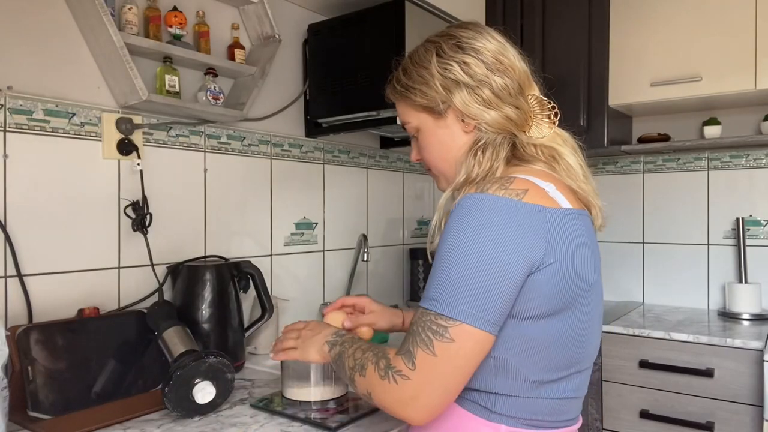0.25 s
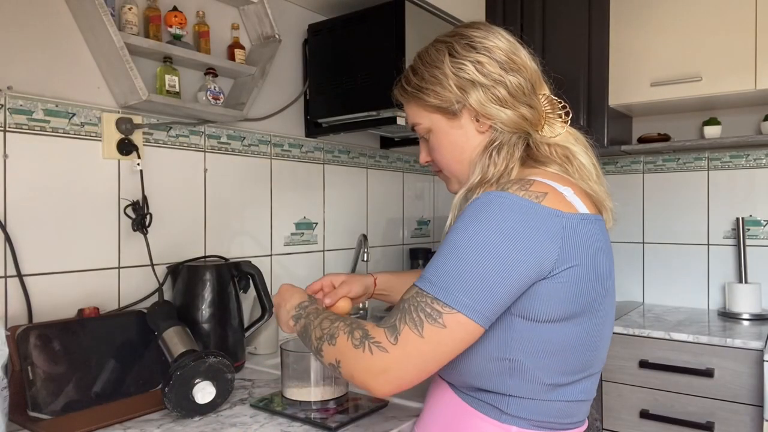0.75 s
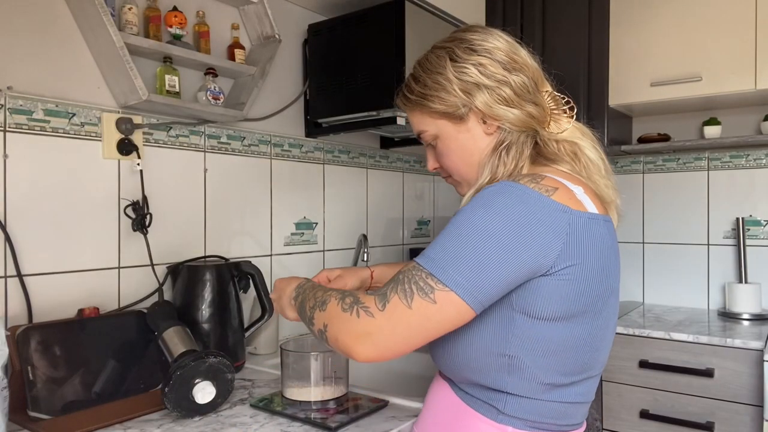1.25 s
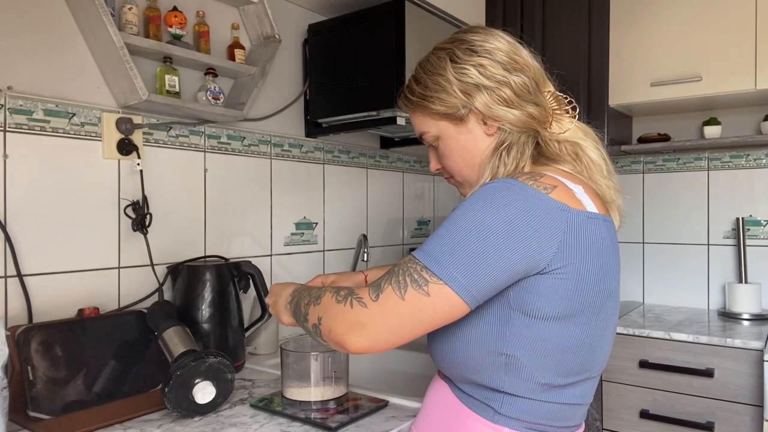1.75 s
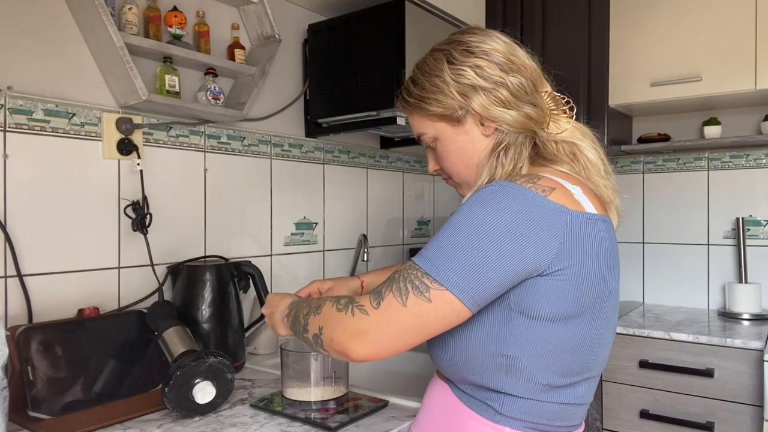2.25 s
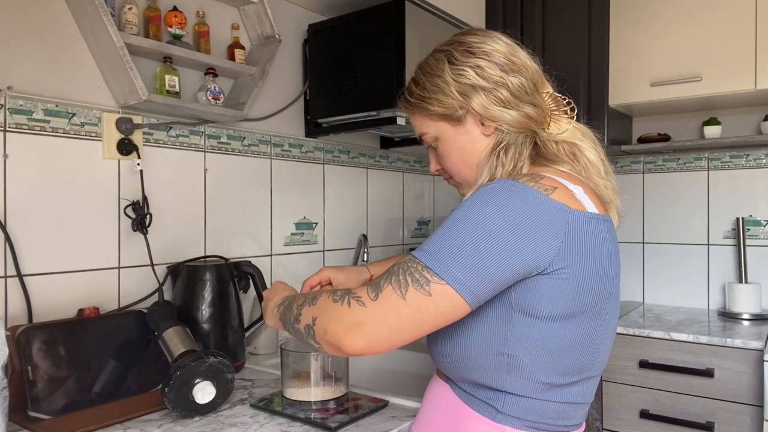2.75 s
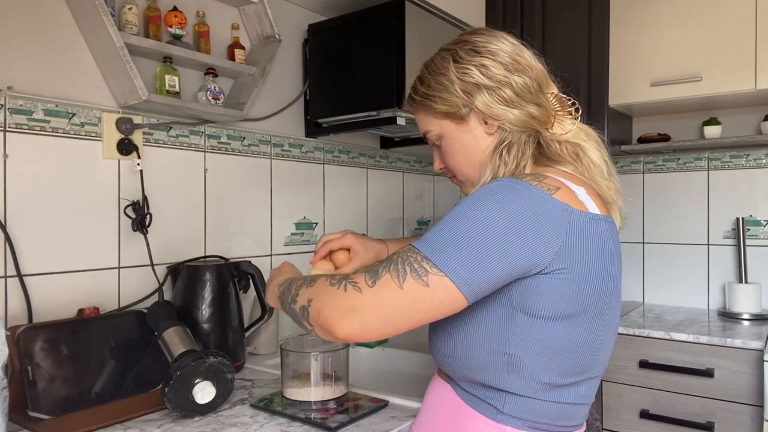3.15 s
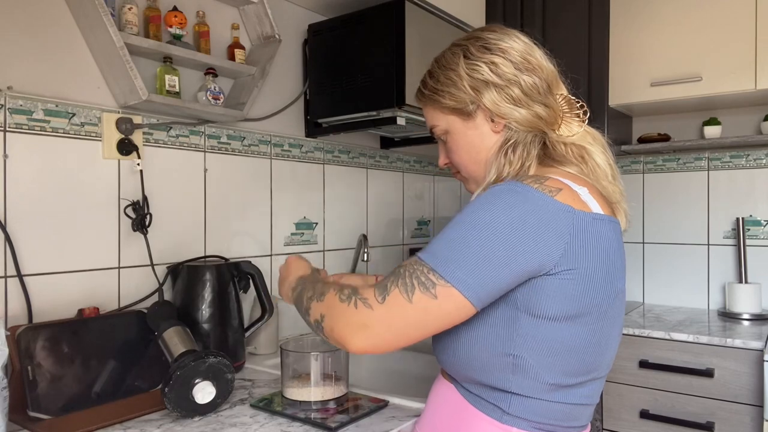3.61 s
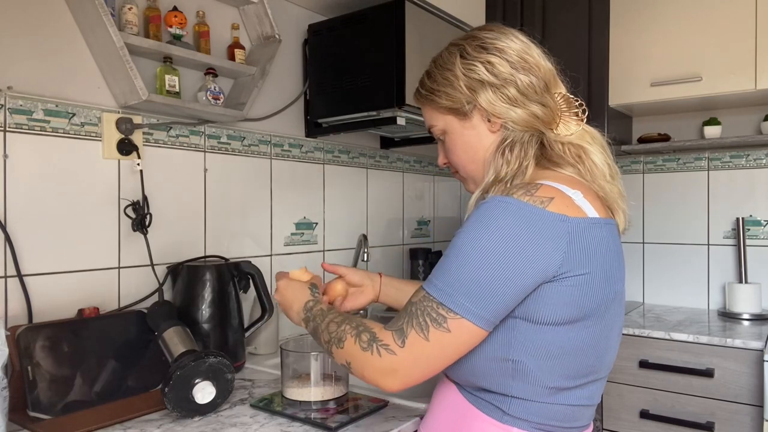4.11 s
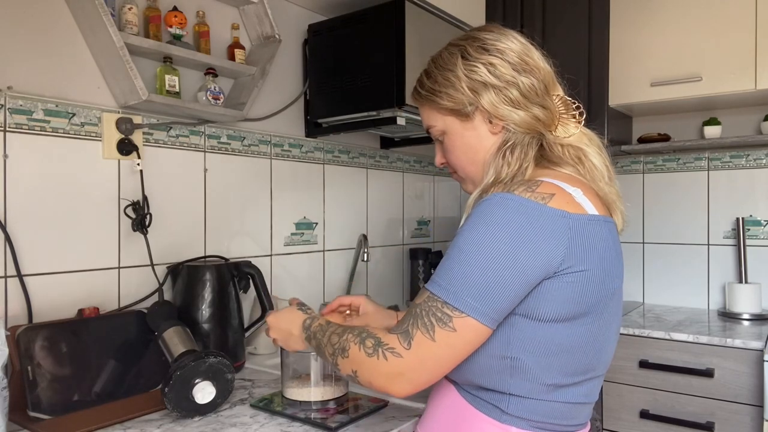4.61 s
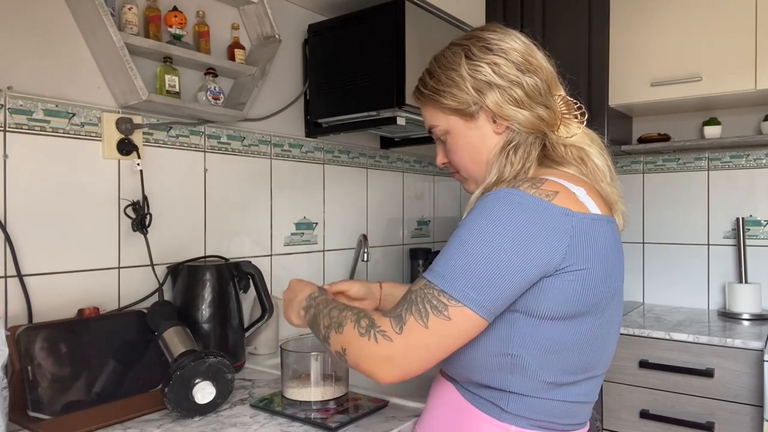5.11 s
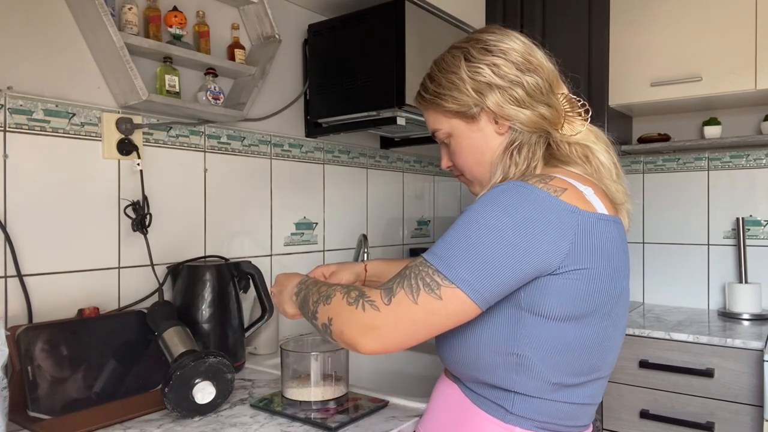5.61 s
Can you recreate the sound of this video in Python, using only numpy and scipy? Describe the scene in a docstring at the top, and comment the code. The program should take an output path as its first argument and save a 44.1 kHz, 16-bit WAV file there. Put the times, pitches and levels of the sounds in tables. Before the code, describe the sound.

A close stereo recording in a small tiled kitchen, with short bright reflections, over a soft low hum and dull rumble leaning left. At 0.0 and 0.15 s an egg knocks the rim of a plastic beaker: a faint first touch with a tiny rising squeak, then a crunchier crack, with a low bouncing thud from the board. Faint ticks follow at 0.7 and 1.1 s. Around 1.55-1.6 s the shell snaps rapidly and a thumb breaks in with a dull pop; near 2.25-2.3 s a stronger hollow crunch and second pop tear the halves apart. From 2.6 to 4.5 s there are only sparse hollow ticks, faint crackle and thin fingertip rubs, while low tones gently swell and fade. At 4.58 and 4.79 s two solid knocks crunch and ring the plastic, thumping the worktop. From 5.2 s to the end the second egg is prised open in small dry snaps and crackle.

```python
"""At the worktop of a small tiled kitchen, two microphones close by, a hum and a dull rumble run throughout.
First an egg knocks and squeaks on the rim of a plastic blender beaker: shell crushes, plastic rings, board bounces.
Thumbs then snap the shell, break in with a dull pop, tear the halves apart and rub the shell, which rings hollow.
A few low tones swell and fade in the rumble, the first before the shell opens, two more as the hands work on.
Late on come two more knocks, one last low swell, and a second egg is prised open in snaps and crackle."""
import sys
import numpy as np
from scipy import signal
from scipy.fft import rfft, irfft
from scipy.io import wavfile
from scipy.ndimage import uniform_filter1d

SR = 44100
rng = np.random.default_rng(int(sys.argv[2]) if len(sys.argv) > 2 else 0)


def to_wav(s):
    """Save 16-bit WAV."""
    ch = np.atleast_2d(s).T  # columns
    pcm = np.round(np.clip(ch, -1, 1) * 32767)  # PCM
    wavfile.write(sys.argv[1], SR, pcm.astype(np.int16))


N = 258749
TIME = np.arange(N) / SR

# Levels in the tables are at the source: gains in the functions, the room and the microphones come on top.
# egg on the rim: start_s, crunch_db, beaker_db, thud_db, crush_s, beaker_tilt_db_per_octave,
#                 egg_body_hz, egg_body_db, shell_wall_hz, shell_wall_db
KNOCKS = [(0.0, -35, -37, -37, 0.0029, -0.5, 1030, -39.5, 2570, -36),
          (0.153, -20.5, -42, -34, 0.004, -3, 840, -34.5, 3710, -43),
          (4.581, -21.5, -27.5, -32, 0.0037, -0.7, 1120, -31, 2190, -38.5),
          (4.786, -21.5, -32.5, -32, 0.005, 0, 970, -33.5, 2950, -38)]
# shell crushed on the rim, spectrum: pitch_hz, level_db
CRUNCH_SPECTRUM = [(100, -27), (300, -3.5), (550, -1.5), (800, 6), (1100, 4.5), (1500, 6), (2200, -3.5),
                   (3000, 3), (4100, -7.5), (5300, -1), (7000, -4), (9700, -5), (13000, 5), (14600, -38)]
# short clack of the beaker wall, spectrum: pitch_hz, level_db
CLACK_SPECTRUM = [(100, -26.5), (300, -1.5), (500, -11.5), (700, -1.5), (870, -3), (1100, -1), (1500, 0),
                  (2100, -4.5), (3200, -9), (6000, -14), (15000, -27)]
# ringing modes of the beaker: pitch_hz, level_db, t60_s
BEAKER_MODES = [(328, -9.5, 0.15), (632, -7.5, .06), (705, 3.5, 0.09), (1050, -2, 0.14), (1364, 1, .11),
                (1450, 8, 0.13), (1564, -4, 0.12), (1797, -3, 0.09), (1950, -2.5, .15), (2614, -12, 0.06),
                (3120, -15.5, 0.07)]
# ringing modes of the worktop: pitch_hz, level_db, t60_s
WORKTOP_MODES = [(49.6, 5, 0.99), (83.5, -3.5, 0.17), (99.4, 1, 0.29), (223, -20, 0.44)]

# egg skidding on the rim: start_s, length_s, start_pitch_hz, level_db
SKIDS = [(0.0, 0.0377, 698, -42), (0.047, 0.028, 692.5, -48.5)]
SKID_RISE_HZ_PER_S, SKID_FADE_DB_PER_S = 1525, 91.5

# dull rumble, spectrum: pitch_hz, level_db
RUMBLE_SPECTRUM = [(15, -28.5), (28, -3.5), (59, -4), (110, -8), (172, -10), (290, -7), (380, -8),
                   (520, -28.5), (1390, -41), (2500, -50), (3540, -59.5), (7000, -53.5), (13000, -81),
                   (14500, -85.5)]
# level of the low rumble, including the low boom left by the knocks: time_s, level_db
RUMBLE_LEVEL = [(0.0, -62), (2.12, -67), (3.12, -64), (4.17, -72.5), (4.62, -67.5), (4.75, -62),
                (5.03, -66.5), (5.52, -69), (5.87, -64.5)]
# appliance hum: pitch_hz, level_db
HUM_TONES = [(49.8, -56), (99.3, -67), (2468, -88)]
# faint diffuse air of the room, spectrum: pitch_hz, level_db
AIR_SPECTRUM = [(200, 0.5), (1300, 6), (2400, -2.5), (4000, -17), (13000, -22.5), (14500, -49)]
# low tones in the rumble, at rest: pitch_hz, level_db
LOW_TONES = [(136.8, -72), (223.4, -70.5), (252.9, -66.5)]
# one of the low tones swells and fades: start_s, length_s, pitch_hz, rise_db
SWELLS = [(0.748, 1.23, 136.8, 12.5), (2.52, 0.9, 252.9, 6), (2.798, .85, 223.4, 10.5),
          (4.434, 1.03, 223.4, 10.5)]
SWELL_EDGE_S = 0.2      # time to rise, and to fall
TONES_FOLLOW = 0.456    # share of the rumble's swing in dB that the tones follow

# shell snapping under the thumbs: start_s, snap_db, hollow_db
SNAPS = [(0.707, -52, -86.5), (1.074, -54, -60.5), (1.5479, -35.5, -52), (1.567, -40, -42),
         (1.5746, -33.5, -33), (1.606, -32, -39.5), (2.1304, -45, -44.5), (2.181, -50.5, -73),
         (2.2674, -32.5, -26.5), (2.2811, -30, -23), (2.2979, -24, -35), (2.584, -47.5, -44),
         (3.6601, -52, -45.5), (3.769, -66, -48), (3.825, -50.5, -53), (3.953, -46.5, -50.5),
         (5.138, -58.5, -50), (5.2835, -34.5, -35), (5.4054, -41, -34.5), (5.63, -72, -47.5),
         (5.6937, -43.5, -82), (5.737, -39, -70), (5.762, -45, -62)]
# snapping and tearing shell, spectrum: pitch_hz, level_db
SNAP_SPECTRUM = [(150, -3.5), (500, 2.5), (700, -4.5), (950, -17.5), (2000, 0), (3500, 0), (7000, -5),
                 (11500, 0), (13400, 0), (14600, -25)]
SNAP_LENGTH_S = .0027   # sets how long the breaks of one snap last
# hollow shell in the hands, its pitch shifting as the eggs are opened: time_s, pitch_hz, t60_s
HOLLOW = [(1.565, 1580, 0.003), (1.58, 1350, .005), (1.61, 1840, .007), (2.14, 1420, 0.0095),
          (2.26, 2150, 0.017), (2.32, 2890, 0.0059), (2.6, 1920, 0.011), (3.66, 1746, .013),
          (3.8, 1710, 0.014), (4.05, 1730, 0.018), (4.45, 1440, 0.014), (5.29, 1456, 0.012),
          (5.41, 1404, 0.0079), (5.48, 1170, .013), (5.63, 1330, 0.0097)]
# halves rubbed and prised apart, membrane tearing: start_s, length_s, crackle_db, hollow_db
TEARS = [(1.55, 0.019, -57, -51.5), (2.257, 0.068, -45, -40.5), (3.739, 0.12, -83, -57.5),
         (3.869, 0.19, -73.5, -71), (4.38, 0.27, -72.5, -68), (5.187, 0.24, -92, -60),
         (5.389, 0.078, -61, -47.5), (5.747, 0.06, -63, -80)]
GIVE_SHARE, PULL_SWELL_DB = 0.69, 10   # a pull builds over this share of its length, by this much, then gives
# thumb breaking through into the full egg: start_s, level_db
PUNCTURES = [(1.5743, -22.5), (2.283, -28)]
POP_HZ, POP_T60_S = 513, 0.011
# fingertip sliding on smooth shell: start_s, length_s, pitch_hz, level_db
RUBS = [(1.864, 0.032, 4650, -76.5), (2.057, 0.018, 3700, -74), (3.82, 0.11, 6430, -78),
        (3.928, 0.036, 4960, -67.5), (4.235, 0.081, 4980, -79)]

# decay of the kitchen: pitch_hz, t60_s
KITCHEN_DECAY = [(150, 0.9), (530, 0.26), (1400, 0.34), (3700, 0.37), (7000, 0.32), (12000, 0.26)]
# colour of the microphone pair, left minus right: pitch_hz, difference_db
EAR_COLOUR = [(250, 9.5), (500, 0), (750, 0), (1400, 1.5), (2800, 0), (4000, -3), (6500, -10.5), (8000, 1),
              (10000, 2)]
HANDS_PAN_DB = -1.5     # left minus right: the hands sit slightly right
TOP_STOP_HZ = 16500     # nearly nothing passes above this


def from_db(db):
    """Decibels to gain."""
    return 10 ** (np.asarray(db) / 20)


def unit_energy(x):
    """Scale so that the squares sum to one."""
    return x / np.sqrt(np.sum(x ** 2, axis=-1, keepdims=True) + 1e-20)


def rms_one(x):
    """Scale to unit power."""
    return unit_energy(x) * np.sqrt(x.shape[-1])


def in_time(rows):
    """Columns of a curve table at every sample."""
    times, *columns = np.transpose(rows)
    return [np.interp(TIME, times, column) for column in columns]


def at_hz(points, hz):
    """Read a table on a log-frequency axis."""
    f, value = np.transpose(points)
    return np.interp(np.log(np.maximum(hz, 1)), np.log(f), value)


def add(track, s, sound):
    """Mix a sound in at time s."""
    start = max(0, round(s * SR))
    track[..., start:start + sound.shape[-1]] += sound[..., :N - start]


def panned(x, db):
    """Place a sound by its level difference, left minus right."""
    return x * from_db([[db / 2], [-db / 2]])


def drift(rate):
    """Random wander of unit power, with rate new values a second joined by straight lines."""
    knots = rng.standard_normal(int(N / SR * rate) + 2)
    return rms_one(np.interp(TIME * rate, np.arange(len(knots)), knots))


def coloured(x, spectrum, size=4096):
    """Causal (minimum-phase) filter with the given spectrum, built by folding its cepstrum."""
    cepstrum = irfft(np.log(from_db(at_hz(spectrum, np.fft.rfftfreq(size, 1 / SR)))))
    cepstrum[1:size // 2] *= 2
    cepstrum[size // 2 + 1:] = 0
    response = irfft(np.exp(rfft(cepstrum)))
    return signal.fftconvolve(np.atleast_2d(x), response[None], axes=1)[:, :x.shape[-1]]


def ring(x, hz, t60):
    """One damped mode: a two-pole resonator that falls 60 dB in t60 seconds."""
    r, w = from_db(-60 / (t60 * SR)), 2 * np.pi * hz / SR
    return signal.lfilter([np.sin(w), 0, -np.sin(w)], [1, -2 * r * np.cos(w), r * r], x + 1e-18)


def fractures(envelope, per_s, spread_db):
    """Tiny breaks of very uneven size at random moments under an envelope; unit energy."""
    n = len(envelope)
    sizes = from_db(spread_db * np.minimum(rng.exponential(1, n), 4))
    signs = rng.choice([-1, 1], n)
    happens = rng.random(n) < per_s / SR
    return unit_energy(envelope * sizes * signs * happens)


def burst(t, length):
    """A break builds quickly and dies away."""
    u = t / max(length, 1e-4)
    return np.sqrt(u) * np.exp(-2 * u)


def crack(length, per_s=12000, spread_db=3.0, size=4096, count=12):
    """A short run of fractures, flattened until it carries nearly equal energy at every pitch."""
    t = np.arange(size) / SR
    x = fractures(burst(t, length), per_s, spread_db)
    window = np.exp(-(t / max(2 * length, 1e-3)) ** 4)
    for _ in range(count):
        spectrum = rfft(x)
        x = irfft(spectrum / (np.abs(spectrum) + 1e-12)) * window
    return unit_energy(x)


def bounce(t, high_hz=77.4, low_hz=50.0, settle_s=0.047, swell_s=0.031, push_s=0.0042, modes_db=-3.0):
    """The board under the beaker rocks, its pitch sinking as the load comes off, and the worktop rings on."""
    hz = low_hz + (high_hz - low_hz) * np.exp(-t / settle_s)
    phase = 2 * np.pi * np.cumsum(hz) / SR
    rocking = unit_energy(t * np.exp(-2 * t / swell_s) * np.sin(phase))
    push = burst(t, push_s)
    modes = sum(from_db(db) * unit_energy(ring(push, f, t60)) for f, db, t60 in WORKTOP_MODES)
    return unit_energy(rocking + from_db(modes_db) * unit_energy(modes))


def knocks(crunch_db=16.5, beaker_db=22.5, clack_db=22.5, thud_db=32.0, thud_delay_s=.012,
           egg_db=17.5, body_t60=.022, wall_t60=.012):
    """Shell caves in on the rim, egg and beaker sound from that contact, and the worktop follows with a bounce."""
    shell, egg, beaker, worktop = np.zeros((4, N))
    t = np.arange(SR // 2) / SR
    for (s, shell_level, ring_level, thud_level, crush, tilt,
         body_hz, body_level, wall_hz, wall_level) in KNOCKS:
        contact = np.pad(crack(crush), (0, len(t)))
        add(shell, s, from_db(shell_level + crunch_db) * contact)
        for hz, level, t60 in ((body_hz, body_level, body_t60), (wall_hz, wall_level, wall_t60)):
            add(egg, s, from_db(level + egg_db) * unit_energy(ring(contact, hz, t60)))
        clack = unit_energy(coloured(contact, CLACK_SPECTRUM)[0])
        # each mode is struck a little differently every time
        modes = sum(from_db(db + rng.normal()) * unit_energy(ring(contact, hz, t60))
                    for hz, db, t60 in BEAKER_MODES)
        plastic = from_db(clack_db) * clack + from_db(beaker_db) * unit_energy(modes)
        hardness = [(300, -2 * tilt), (4800, 2 * tilt)]   # four octaves
        add(beaker, s, from_db(ring_level) * coloured(plastic, hardness)[0])
        add(worktop, s + thud_delay_s, from_db(thud_level + thud_db) * bounce(t))
    return coloured(shell, CRUNCH_SPECTRUM) + egg + beaker, worktop


def squeak(waver=0.066, rough_db=4.0, octave_db=-13.0):
    """Shell sticks and slips on plastic: an unsteady, rising tone and its octave, rough and fading."""
    out = np.zeros(N)
    for s, length, start_hz, level in SKIDS:
        t = np.arange(int(length * SR)) / SR
        hz = (start_hz + SKID_RISE_HZ_PER_S * t) * (1 + waver * drift(300)[:len(t)])
        phase = 2 * np.pi * np.cumsum(hz) / SR
        grip_db = rough_db * drift(250)[:len(t)] - SKID_FADE_DB_PER_S * t
        grip = signal.windows.tukey(len(t), .2) * from_db(grip_db)
        tone = np.sin(phase) + from_db(octave_db) * np.sin(2 * phase)
        add(out, s, from_db(level) * rms_one(grip * tone))
    return out


def wandering_tone(hz, wander_hz, rate):
    """A sine of unit power whose pitch wanders."""
    return rms_one(np.sin(2 * np.pi * np.cumsum(hz + wander_hz * drift(rate)) / SR))


def low_tones(swing_db, waver_db=2.0, wander_hz=1.245):
    """Low tones ride on the rumble; now and then one swells, holds and fades."""
    pitches, rest_db = np.transpose(LOW_TONES)
    levels = rest_db[:, None] + TONES_FOLLOW * swing_db
    for s, length, hz, rise_db in SWELLS:
        shape = np.clip(np.minimum(TIME - s, s + length - TIME) / SWELL_EDGE_S, 0, 1)
        levels[np.argmin(np.abs(pitches - hz))] += rise_db * shape
    return sum(from_db(db + waver_db * drift(10)) * wandering_tone(hz, wander_hz, 12)
               for hz, db in zip(pitches, levels))


def background(rumble_db=6.0, side_db=-4.5, air_db=-70.0, pan_db=4.0):
    """Hum, low tones and filtered-noise rumble lean left; faint air, independent in each microphone, fills in."""
    level, = in_time(RUMBLE_LEVEL)
    mid, side = rms_one(coloured(rng.standard_normal((2, N)), RUMBLE_SPECTRUM))
    rumble = from_db(level + rumble_db) * (mid + from_db(side_db) * side * [[1], [-1]])
    hum = sum(from_db(db) * wandering_tone(hz, 0.25, 2) for hz, db in HUM_TONES)
    air = rms_one(coloured(rng.standard_normal((2, N)), AIR_SPECTRUM))
    tones = low_tones(level - level.mean())
    return panned(rumble + hum + tones, pan_db) + from_db(air_db) * air


def shell_cavity(x, s, short_db=-11.5):
    """Hollow of the shell as held at time s: a main resonance and a weaker, shorter one at the same pitch."""
    times, pitches, rings = np.transpose(HOLLOW)
    hz, t60 = np.interp(s, times, pitches), np.interp(s, times, rings)
    return ring(x, hz, t60) + from_db(short_db) * ring(x, hz, t60 / 2)


def snaps(snap_db=12.5, hollow_db=13.5):
    """Each snap is a brief run of fractures that also sounds the hollow of the shell."""
    sharp, hollow = np.zeros((2, N))
    for s, level, hollow_level in SNAPS:
        breaks = crack(SNAP_LENGTH_S)
        add(sharp, s, from_db(level + snap_db) * breaks)
        add(hollow, s, from_db(hollow_level + hollow_db) * unit_energy(shell_cavity(breaks, s)))
    return coloured(sharp, SNAP_SPECTRUM) + hollow


def tears(per_s=700, spread_db=4.8, count=7):
    """Crackle builds until the halves give, then eases; the hollow changes pitch as the opening changes."""
    crackle, hollow = np.zeros((2, N))
    for s, length, level, hollow_level in TEARS:
        along = np.linspace(0, 1, int(length * SR))
        pull = np.interp(along, [0, GIVE_SHARE, 1], [-1, 0, -1])
        breaks = fractures(from_db(PULL_SWELL_DB * pull), per_s, spread_db)
        add(crackle, s, from_db(level) * rms_one(breaks))
        # overlapping stages, each through the cavity of its own moment
        stages = [np.maximum(0, 1 - np.abs(along * (count - 1) - k)) for k in range(count)]
        moments = np.linspace(s, s + length, count)
        glide = sum(shell_cavity(breaks * stage, moment) for stage, moment in zip(stages, moments))
        add(hollow, s, from_db(hollow_level) * rms_one(glide))
    return coloured(crackle, SNAP_SPECTRUM) + hollow


def punctures(cave_in_s=0.005):
    """The shell caves in and the liquid behind it gives one short, low resonance."""
    out = np.zeros(N)
    for s, level in PUNCTURES:
        pop = ring(crack(cave_in_s), POP_HZ, POP_T60_S)
        add(out, s, from_db(level) * unit_energy(pop))
    return out


def rubs(wall_t60=.008, per_s=3600, spread_db=7.0):
    """Tiny slips of skin ring the thin shell wall."""
    out = np.zeros(N)
    for s, length, hz, level in RUBS:
        slips = fractures(np.sqrt(np.hanning(int(length * SR))), per_s, spread_db)
        add(out, s, from_db(level) * rms_one(ring(slips, hz, wall_t60)))
    return out


def evenly_coloured(response, size=4096):
    """Even colouring of a reflection pattern: narrow peaks and dips of pitch are levelled to their surroundings."""
    power = np.abs(rfft(response)) ** 2
    bins_per_hz = len(response) / SR
    narrow, wide = (uniform_filter1d(power, int(width_hz * bins_per_hz)) for width_hz in (130, 2500))
    hz = np.fft.rfftfreq(len(response), 1 / SR)
    levelling = np.c_[hz, 10 * np.log10(wide / narrow)][1:]
    return coloured(response, levelling, size=size)[0]


def kitchen(x, direct_db, early_db, tail_db, early_s=0.0037, lag_s=.00056, size=32768, count=11):
    """Direct sound, a quick scatter off the tiled corner, and a tail that lasts longest in the bass."""
    t, hz = np.arange(size) / SR, np.fft.rfftfreq(size, 1 / SR)
    centres = np.geomspace(100, 15000, count)
    white, tail = rfft(rng.standard_normal((2, size))), 0
    for centre, weights in zip(centres, np.eye(count)):
        band = irfft(white * at_hz(np.c_[centres, weights], hz))
        tail = tail + band * from_db(-60 * t / at_hz(KITCHEN_DECAY, centre))
    late = from_db(tail_db) * unit_energy(tail * (1 - np.exp(-t / 0.0025)))
    early = from_db(early_db) * np.array([crack(early_s, size=size) for ear in range(2)])
    early[[0, 1], [0, round(lag_s * SR)]] += from_db(direct_db)   # the left microphone is nearer
    response = sum(np.array([evenly_coloured(ear) for ear in part]) for part in (early, late))
    return signal.fftconvolve(x, response, axes=1)[:, :N]


def ear_coloured(x):
    """Each microphone colours rim and hands its own way: left fuller in low mids, right brighter near 6 kHz."""
    return np.array([coloured(ear, [(hz, side * db / 2) for hz, db in EAR_COLOUR])[0]
                     for ear, side in zip(x, (1, -1))])


def scene():
    """Rim and hands sound through the kitchen from their own places; thud and background come in directly."""
    rim, worktop = knocks()
    at_rim = kitchen(panned(rim + squeak(), db=-1.0), direct_db=-3.0, early_db=-1.0, tail_db=1.5)
    shell = snaps() + punctures() + from_db(-4.5) * (tears() + rubs())
    in_hands = kitchen(panned(shell, HANDS_PAN_DB), direct_db=-8.0, early_db=-1.5, tail_db=0.0)
    return ear_coloured(at_rim + in_hands) + panned(worktop, db=7.0) + background()


def record(dry):
    """The microphones drop the deepest bass, below about 40 Hz; the top is cut."""
    thinned = signal.sosfilt(signal.butter(6, 40, "high", fs=SR, output="sos"), dry)
    return signal.sosfilt(signal.cheby2(14, 70, TOP_STOP_HZ, fs=SR, output="sos"), thinned)


dry = scene()
out = record(dry)
to_wav(out)
```